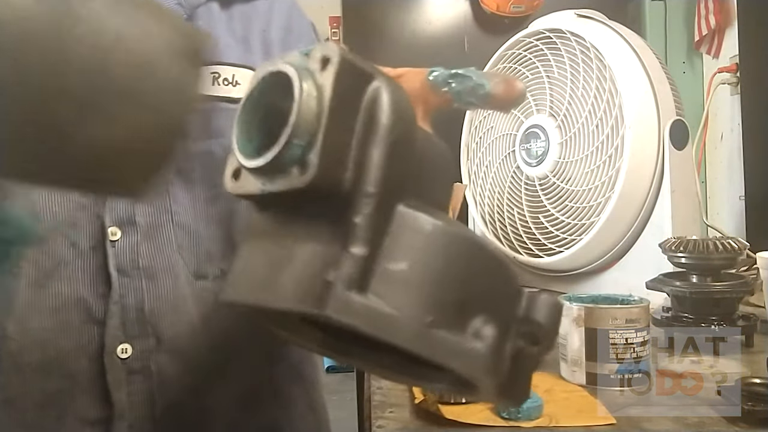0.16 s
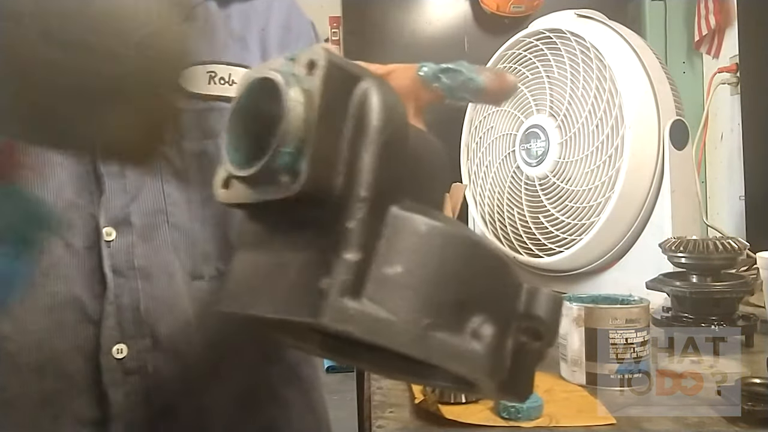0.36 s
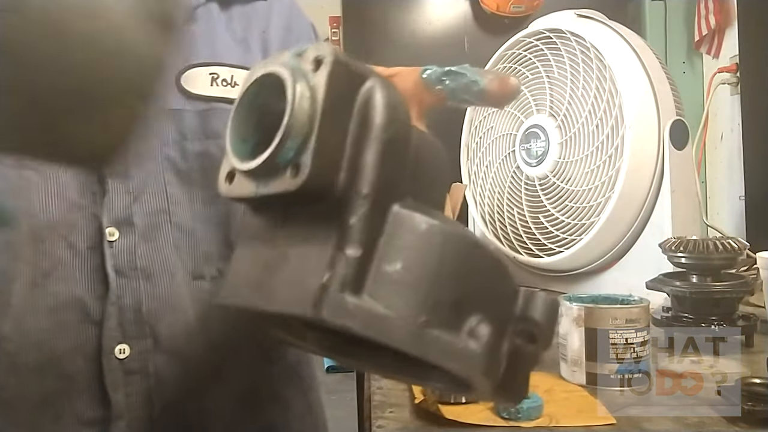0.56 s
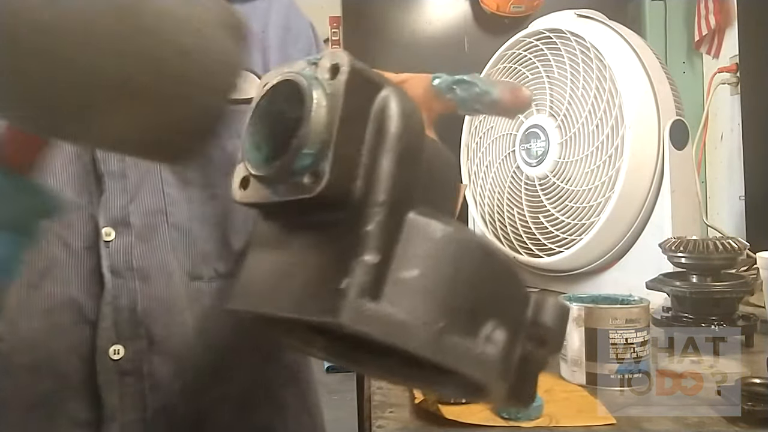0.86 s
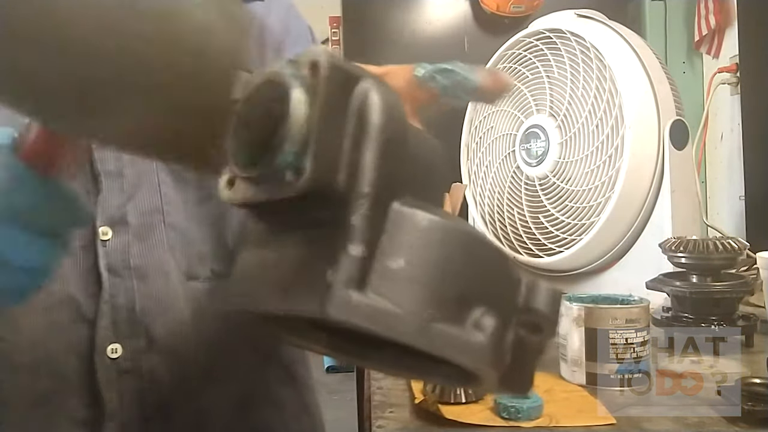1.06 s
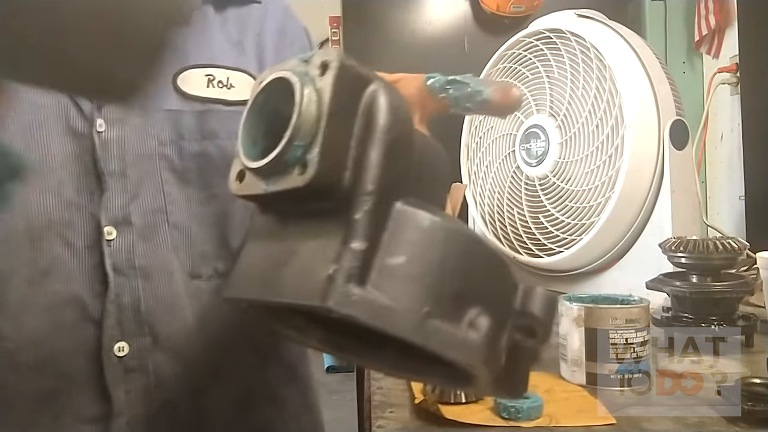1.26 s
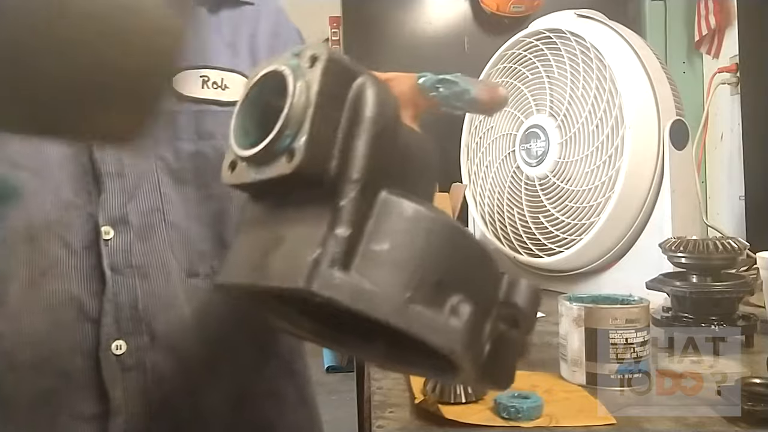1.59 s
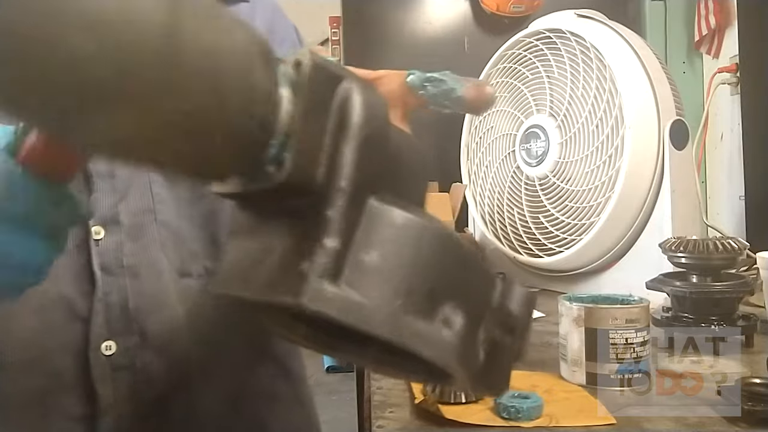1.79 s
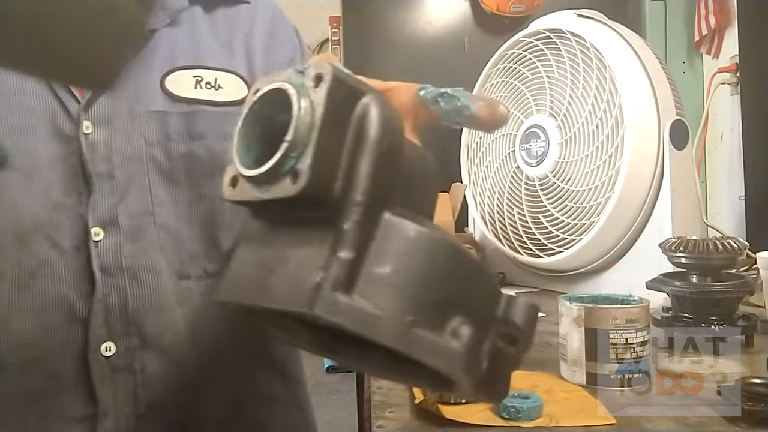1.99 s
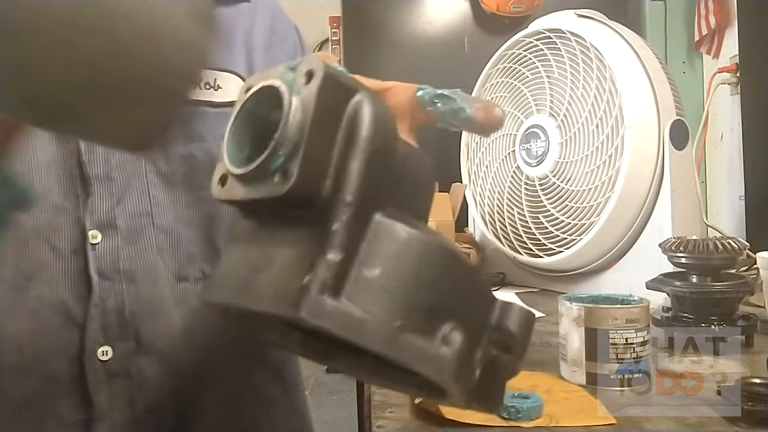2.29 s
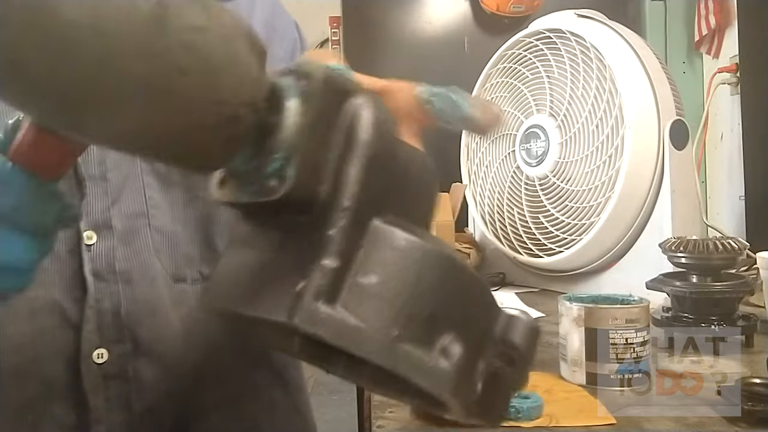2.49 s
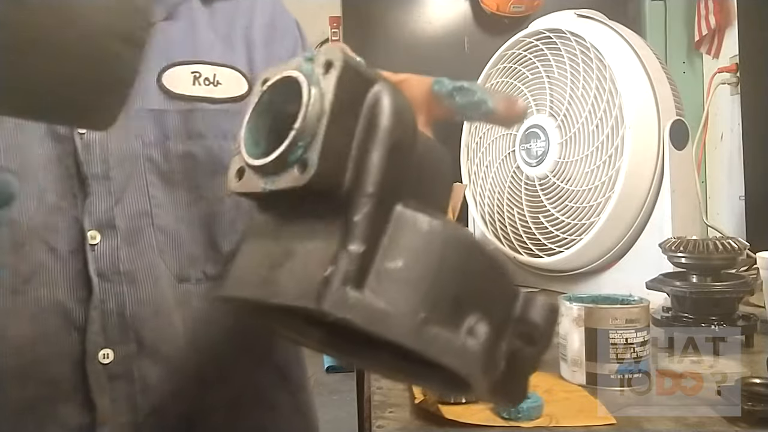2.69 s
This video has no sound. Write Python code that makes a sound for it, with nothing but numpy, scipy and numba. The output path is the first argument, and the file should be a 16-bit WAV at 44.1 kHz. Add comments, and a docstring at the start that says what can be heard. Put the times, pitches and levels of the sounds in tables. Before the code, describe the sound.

Eight close, evenly paced mallet blows knock a metal part into its case, each cracking and ringing briefly with a slightly different tone. A small workshop adds a short echo while a fan rushes and hums softly throughout.

```python
"""A small workshop, stereo microphone close to a hand-held metal gear case. A fan hums and rushes throughout.
A rubber mallet taps a bearing part into the case eight times, about three taps a second.
Each tap is a dull knock and a short crack, then the case rings; where the mallet lands decides
which modes speak. The room answers, and the recorder's limiter ducks the hardest taps."""
import sys
import numpy as np
from scipy import signal
from scipy.fft import rfft, irfft
from scipy.io import wavfile
from scipy.ndimage import uniform_filter1d, minimum_filter1d
from numba import njit

SR = 44100
rng = np.random.default_rng(int(sys.argv[2]) if len(sys.argv) > 2 else 0)


def dump_mix(stems):
    """Bounce the given channels to the path in sys.argv[1] as a 16-bit WAV at rate SR."""
    frames = np.atleast_2d(stems).T  # one column per channel
    limited = np.clip(frames, -1, 1)  # hard clip at full scale
    pcm = np.round(limited * 32767).astype(np.int16)
    wavfile.write(sys.argv[1], SR, pcm)


N = 125685

IMPACT_RISE_S, DIFFUSE_RISE_S = 0.00051, 0.005
METAL_DELAY_S = 0.001  # crack and ring start just after the knock


def undb(db):
    """Decibels to gain."""
    return 10 ** (np.asarray(db) / 20)


def unit(x):
    """Scale to rms 1."""
    return x / np.sqrt(np.mean(x ** 2))


def pan(db):
    """Left and right gains for a level difference, left minus right."""
    return undb(np.array([[db], [-db]]) / 2)


def stereo(mid, side):
    """Mid and side to left and right."""
    return np.array([mid + side, mid - side])


def fade(t, t60):
    """Exponential decay, 60 dB down after t60 seconds."""
    return np.exp(-np.log(1000) * t / t60)


def rise(t, seconds):
    """Soft onset, silent before time zero."""
    return 1 - np.exp(-np.maximum(t, 0) / seconds)


def waver(t, step_s):
    """Slow random motion: a new value every step, joined by straight lines."""
    knots = np.arange(0, t[-1] + step_s, step_s)
    return np.interp(t, knots, rng.standard_normal(len(knots)))


def gain_at(hz, points):
    """Gain along (Hz, dB) points on a log-frequency axis."""
    f, db = np.array(points, float).T
    return undb(np.interp(np.log(np.maximum(hz, 1)), np.log(f), db))


def colour(x, points):
    """Give a steady noise a spectrum."""
    n = x.shape[-1]
    return irfft(rfft(x) * gain_at(np.fft.rfftfreq(n, 1 / SR), points), n)


def fan():
    """Behind the work, a fan: rushing air and the wavering hum of motor and blades."""
    # Spectrum of the rush. Each row: frequency in Hz, relative density in dB.
    air_spectrum = [(40, -13), (90, -0.5), (190, -2), (300, -0.5), (400, -5), (620, -2), (1000, -10.5),
                    (1450, -15), (2000, -17), (2600, -20.5), (5000, -31), (7000, -36.5), (16000, -44)]
    # Partials of the hum. Each row: frequency in Hz, rms level in dB.
    partials = [(58, -64), (112, -61), (168, -65), (224, -63.5), (281, -65.5)]
    mid, side = (unit(colour(rng.standard_normal(N), air_spectrum)) for _ in range(2))
    air = undb(-53) * stereo(mid, undb(-9) * side)
    hum, t = 0, np.arange(N) / SR
    fundamental_hz = partials[0][0]
    for hz, db in partials:
        swell = 1 + 0.09 * waver(t, step_s=0.2)
        drift = 0.18 * waver(t, step_s=0.2) * hz / fundamental_hz
        phase = 2 * np.pi * (hz * t + rng.random()) + drift
        hum += undb(db) * np.sqrt(2) * swell * np.sin(phase)
    return air + hum


def workshop(direct):
    """The room's diffuse reverberation builds quickly and dies sooner in the treble."""
    # Colour of the room. Each row: frequency in Hz, relative level in dB.
    room_spectrum = [(100, -8), (300, -1.5), (1000, 1.5), (1800, -2.5), (2700, 3.5), (4500, 1), (8000, 0.5),
                     (15000, -3.5)]
    t = np.arange(SR) / SR
    noise = colour(rng.standard_normal((2, SR)), room_spectrum)
    low = signal.sosfiltfilt(signal.butter(2, 3000, fs=SR, output="sos"), noise)
    high = noise - low
    tail = (low * fade(t, t60=0.66) + high * fade(t, t60=0.55)) * rise(t, DIFFUSE_RISE_S)
    return undb(-14) * signal.fftconvolve(direct, unit(tail) / np.sqrt(SR), axes=1)[:, :N]


def sizzle(t, strength):
    """A diffuse treble sizzle hangs on after bright taps, then fades."""
    # Spectrum of the sizzle. Each row: frequency in Hz, relative density in dB.
    spectrum = [(3000, -23), (6000, -8), (7200, 10.5), (9000, 0.5), (12000, -11.5), (14800, -6),
                (16000, -32)]
    hold_s = 0.059
    noise = unit(colour(rng.standard_normal((2, len(t))), spectrum))
    envelope = rise(t, DIFFUSE_RISE_S) * fade(np.maximum(t - hold_s, 0), t60=0.083)
    return undb(-61.5) * colour(noise, strength) * envelope


def knock(t, strength):
    """The rubber head shoves the case: a few cycles of low, damped modes."""
    # Low modes of mallet on case. Each row: frequency in Hz, relative level in dB, t60 in seconds.
    low_modes = [(202.6, -42, 0.078), (276.3, -34.5, 0.038), (403, -31.5, 0.016), (827, -22, 0.013),
                 (1021, -20.5, 0.019), (1460, -27, .011)]
    right_lag_s = 0.0001  # the right side of the microphone hears it later
    age = np.maximum(t - np.array([[0], [right_lag_s]]), 0)
    body = 0
    for k, (hz, db, t60) in enumerate(low_modes):
        amplitude = (-1) ** k * undb(db) * gain_at(hz, strength)
        body += amplitude * np.sin(2 * np.pi * hz * age) * fade(age, t60)
    return body * rise(age, IMPACT_RISE_S) * pan(db=0.5)


def crack(t, strength):
    """The part slips in its seat: a burst of noise with a short metallic tail."""
    # Spectrum of metal on metal. Each row: frequency in Hz, relative density in dB.
    spectrum = [(100, -15.5), (300, -4.5), (600, -8.5), (900, 6), (1900, -1.5), (2400, -7.5), (3600, -9.5),
                (4500, -16.5), (7000, -15), (11000, -17), (14500, -23), (16000, -25)]
    # Stereo width of the crack. Each row: frequency in Hz, side minus mid in dB.
    width = [(300, 6), (800, -4), (1800, 1.5), (5000, -4.5)]
    mid, side = rng.standard_normal((2, len(t)))
    noise = unit(colour(stereo(mid, colour(side, width)), spectrum))
    burst = undb(-23.5) * fade(t, t60=0.025)
    rattle = undb(-57.5) * fade(t, t60=0.34)  # dense, weak modes follow the crack
    envelope = (burst + rattle) * rise(t - METAL_DELAY_S, IMPACT_RISE_S)
    return colour(noise, strength) * envelope * pan(db=-5)


def ring(t, strength):
    """Each mode of the case wavers and is soon damped by hand and grease; a weak, detuned twin lingers."""
    # Natural frequencies of the case in Hz.
    mode_hz = [1766, 2561, 2760, 4091, 4284, 4620, 4715, 5525, 5665, 6556, 6848, 7447, 7640, 8505, 9503,
               9870, 10220, 10535, 10795, 11505, 11990, 12800, 13740]
    # Those modes in order. Each row: relative level in dB, t60 in seconds, twin's relative level in dB,
    # left minus right in dB, width (0 both sides in step, 1 opposed).
    modes = [(-33, .11, -65, -2.5, 0.093), (-39.5, 0.33, -54, 7, 0.84), (-25.5, 0.13, -62.5, -1.5, 0.75),
             (-63, 0.076, -72.5, -39, 1), (-35, 0.082, -87, 4.5, 0.22), (-41, 0.11, -65.5, -1, 0.82),
             (-25, 0.043, -63.5, 4, 0.734), (-37, 0.025, -68, 22.5, 0.48), (-38.5, 0.1, -63.5, 1, 0.41),
             (-47.5, 0.086, -68, 22, 1), (-43.5, 0.083, -68, -16, 0.85), (-45.5, 0.065, -66, 22.5, 0.9),
             (-45.5, 0.11, -78, 5.5, .54), (-52, 0.14, -76.5, 11, 1), (-47, .09, -90, 6, 0.26),
             (-52, .1, -100, 14, 0.045), (-58, 0.2, -73, -11, .95), (-57, 0.071, -83, 14, 0.038),
             (-52.5, 0.097, -72, 22, 0.99), (-78, 0.04, -85.5, 5, .5), (-51, 0.08, -93, 14, .3),
             (-51, 0.064, -87, 7, 0.98), (-50, 0.048, -85, 16, .5)]
    wander_hz, detune_hz = 9, 5.1  # standard deviations
    out = 0
    for hz, (db, t60, twin_db, pan_db, width) in zip(mode_hz, modes):
        scatter_db, detune = rng.standard_normal(2)
        wander = np.cumsum(wander_hz * waver(t, step_s=0.012)) / SR
        phase = 2 * np.pi * (hz * t + wander + rng.random()) + np.pi * np.array([[width], [0]])
        main = undb(db + scatter_db) * np.sin(phase) * fade(t, t60) * pan(pan_db)
        twin_phase = phase + 2 * np.pi * detune_hz * detune * t
        twin = undb(twin_db) * np.cos(twin_phase) * fade(t, t60=0.73)
        out += gain_at(hz, strength) * (main + twin)
    return out * rise(t - METAL_DELAY_S, seconds=0.00083)


def mallet_taps():
    """Eight blows close to the microphone, each driving the case with its own colour."""
    # Frequencies in Hz at which a tap's strength is given.
    bands_hz = [300, 900, 1770, 2560, 2760, 4280, 4700, 5600, 7400, 10000, 13500]
    # The blows. Each row: start in seconds, crack gain in dB, then strength in each band in dB.
    blows = [(0.1279, 3, 8.5, -7.5, -3, -2.5, -16, -26, -14, -12, -14, -12, -16),
             (0.4769, 3.7, 3.5, -3, -2.5, -1.5, 3.5, 1.5, 0.5, -1.5, -3, -1, -7),
             (0.8249, 2.3, 2, -2, -1.5, -9, 0.5, 3.5, -2.5, -13, -11.5, -4, -6),
             (1.1541, -2.6, 4.5, 7.5, 7, 2, 6.5, 7.5, 14.5, 9, 5.5, 11, 2.5),
             (1.4973, 1.6, 8, 12.5, 6, 9.5, -2, -5, 1, 4.5, 17.5, 14, 18.5),
             (1.8745, 0.98, 1, -1, 7, -2.5, -12, 2.5, 7, 9.5, 8, 10.5, 0),
             (2.2178, 3.6, -1, 7, 4.5, 2, 2, 12.5, -1.5, 6, 16, 16, 5),
             (2.5604, 5.2, 3, -5, 5.5, 2.5, 4.5, -7, -5.5, 1.5, -1, -6, 3)]
    neighbours = np.abs(np.log2(np.divide.outer(bands_hz, bands_hz))) < 0.4  # octaves
    out, t = np.zeros((2, N + SR)), np.arange(SR) / SR
    for start_s, crack_db, *band_db in blows:
        strength = list(zip(bands_hz, band_db))
        # The crack follows only the broad outline of the blow's colour.
        smooth_db = neighbours @ np.array(band_db) / neighbours.sum(axis=1)
        outline = list(zip(bands_hz, smooth_db + crack_db))
        i = int(start_s * SR)
        out[:, i:i + SR] += knock(t, strength) + ring(t, strength) + crack(t, outline) + sizzle(t, strength)
    return out[:, :N]


def scene():
    """At the microphone: close taps, the room's answer and the fan."""
    direct = mallet_taps()
    return direct + workshop(direct) + fan()


@njit
def follow_peaks(x, retain):
    """Peak follower: instant attack, exponential release."""
    out, peak = np.empty(len(x)), 0.
    for i in range(len(x)):
        peak = max(x[i], peak * retain)
        out[i] = peak
    return out


def record(dry):
    """The recorder cuts the deep bass, ducks the hardest taps with a look-ahead limiter and cuts the top."""
    low_cut_hz, top_hz = 36, 16000
    limit_db, release_s, lookahead_s = -12, 0.02, 0.0022
    dry = signal.sosfilt(signal.butter(6, low_cut_hz, "high", fs=SR, output="sos"), dry)
    window = int(lookahead_s * SR)
    power = uniform_filter1d(np.mean(dry ** 2, axis=0), window)
    amplitude = np.sqrt(2 * np.abs(power))
    excess = np.log(np.maximum(amplitude / undb(limit_db), 1))
    gain = np.exp(-follow_peaks(excess, np.exp(-1 / (release_s * SR))))
    gain = uniform_filter1d(minimum_filter1d(gain, 2 * window), window)  # eases down ahead of the peak
    return signal.sosfilt(signal.ellip(8, .2, 70, top_hz, fs=SR, output="sos"), dry * gain)


dry = scene()
out = record(dry)
dump_mix(out)
```